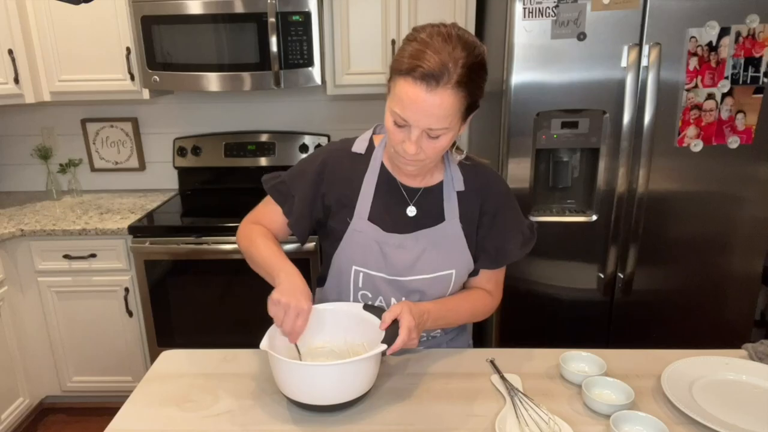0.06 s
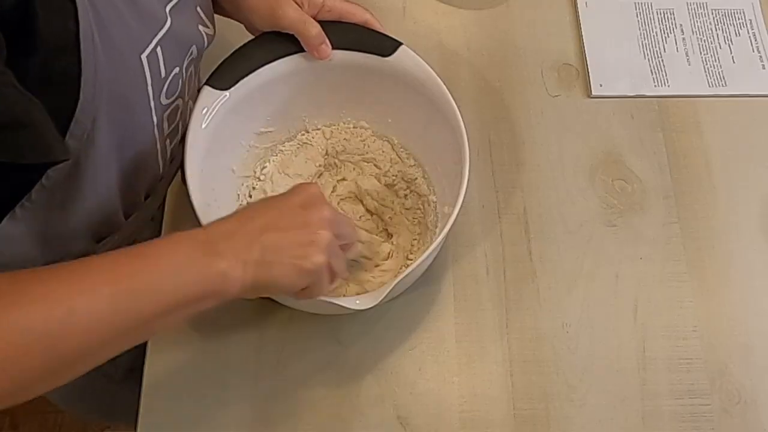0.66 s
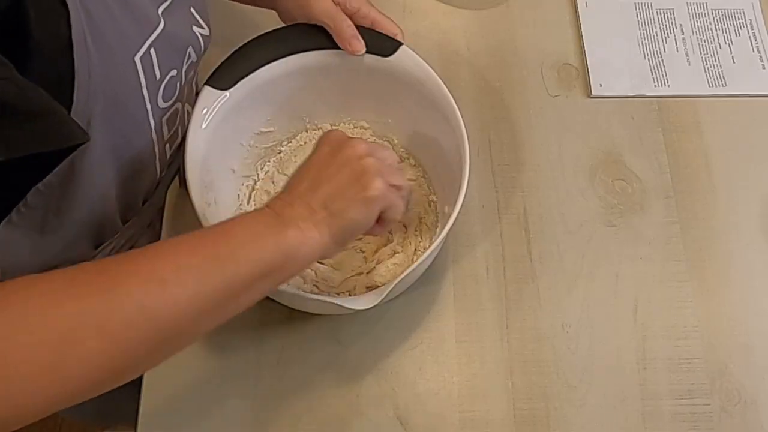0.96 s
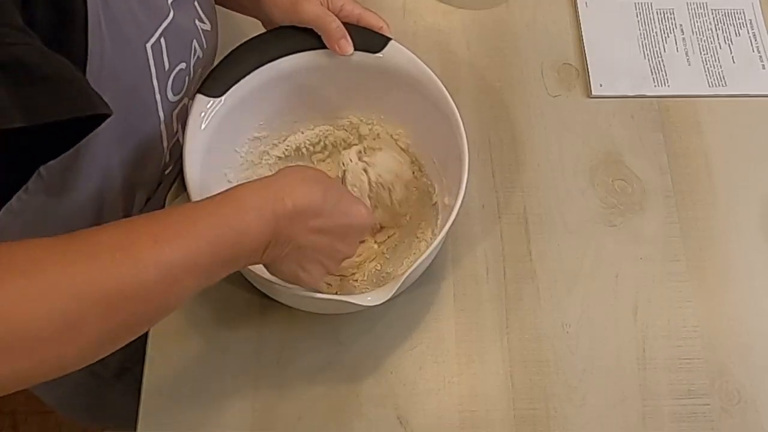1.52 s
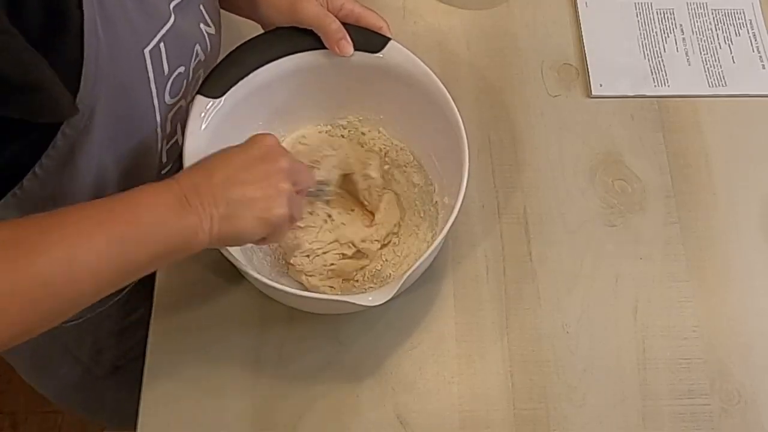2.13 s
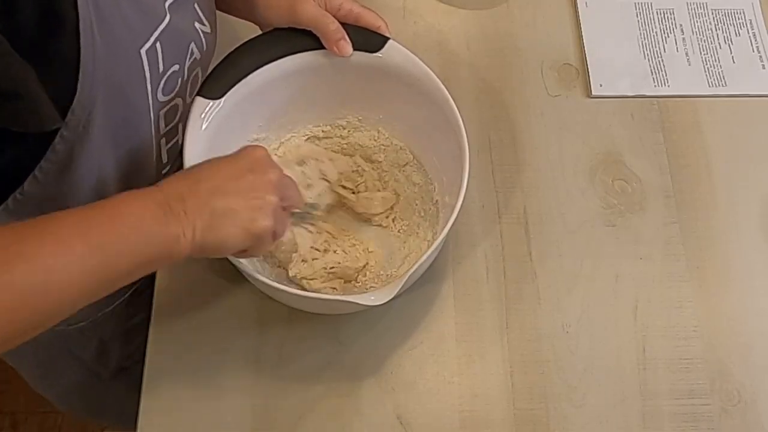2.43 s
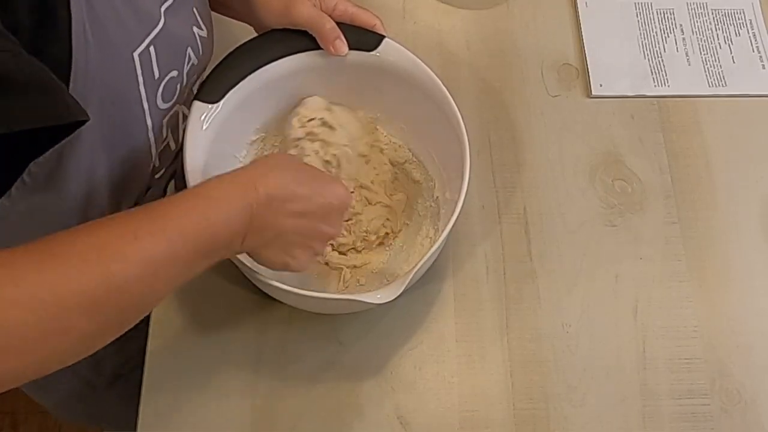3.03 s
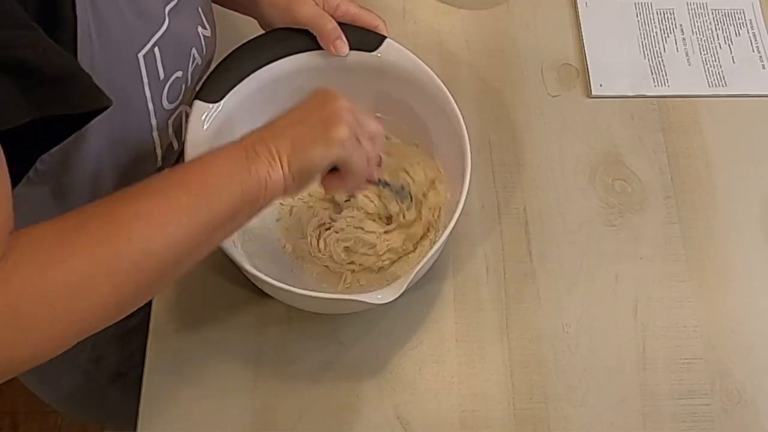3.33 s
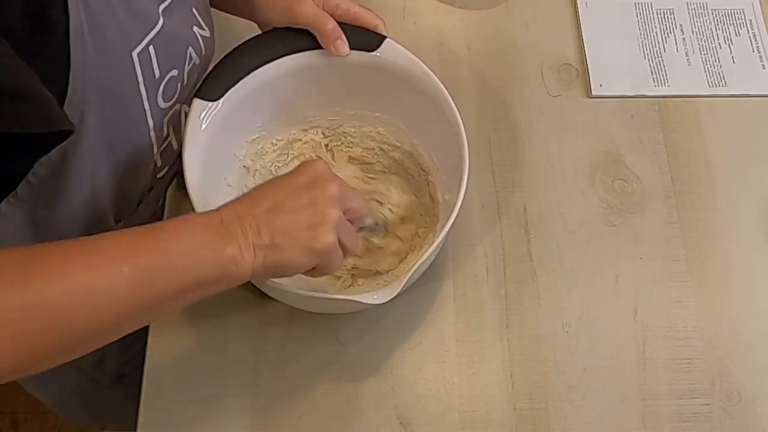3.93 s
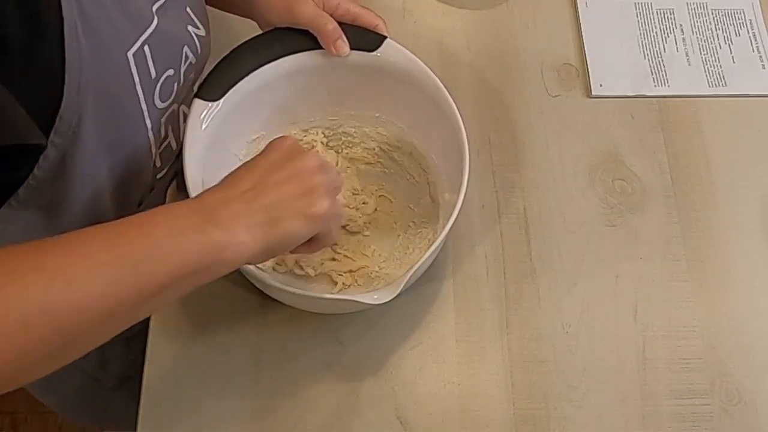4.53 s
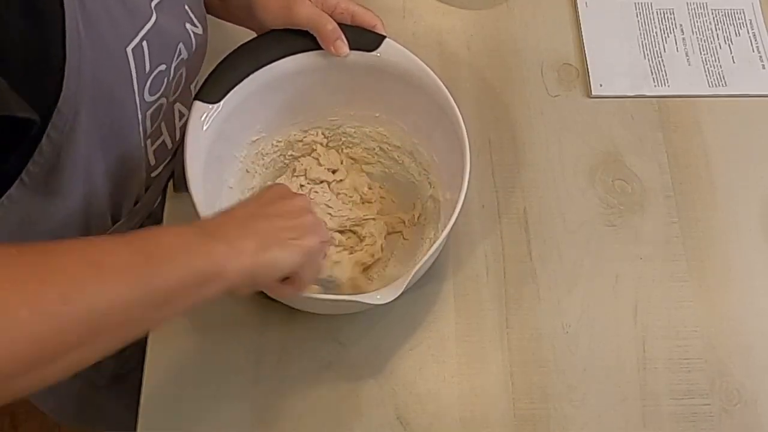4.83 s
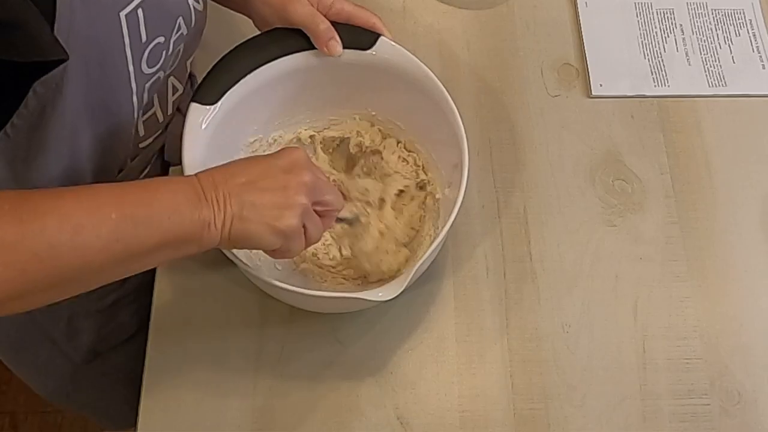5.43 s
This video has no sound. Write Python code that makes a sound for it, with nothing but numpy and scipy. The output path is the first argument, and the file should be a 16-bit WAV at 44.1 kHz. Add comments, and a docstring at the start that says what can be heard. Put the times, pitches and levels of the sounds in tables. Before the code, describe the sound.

Close, sticky stirring in a quiet kitchen: thick dough squelches, crackles and pops softly as a metal spoon pulls through it. The spoon taps the plastic bowl in an irregular rhythm, lightly at first, then with stronger damped knocks from the middle onward. A slight low rumble comes from the counter as the bowl shifts, and an appliance hums faintly throughout.

```python
"""Over faint room air and an appliance's hum, a metal spoon knocks on a plastic mixing bowl.
The knocks come unevenly, about three a second, damped by thick dough; the hard kitchen rings after each.
In between the spoon drags through the dough, which crackles, squelches and pops as trapped air escapes.
The bowl rocks softly and the counter rumbles under it."""
import sys
import numpy as np
from scipy import signal
from scipy.fft import rfft, irfft
from scipy.io import wavfile

SR = 44100
rng = np.random.default_rng(int(sys.argv[2]) if len(sys.argv) > 2 else 0)


def dump_mix(stems):
    """Bounce the given channels to the path in sys.argv[1] as a 16-bit WAV at rate SR."""
    frames = np.atleast_2d(stems).T  # one column per channel
    limited = np.clip(frames, -1, 1)  # hard clip at full scale
    pcm = np.round(limited * 32767).astype(np.int16)
    wavfile.write(sys.argv[1], SR, pcm)


N = 249650
TIME = np.arange(N) / SR


def from_db(db):
    """Decibels to gain."""
    return 10 ** (np.asarray(db) / 20)


def rms_one(x):
    """Scale to rms 1."""
    return x / np.sqrt(np.mean(x ** 2) + 1e-20)


def at_hz(points, hz):
    """Interpolate a table on a log-frequency axis."""
    points_hz, values = np.transpose(points)
    return np.interp(np.log(hz + 1e-9), np.log(points_hz), values)


def coloured(x, spectrum):
    """Filter by a (Hz, dB) curve; rms 1."""
    gain = from_db(at_hz(spectrum, np.fft.rfftfreq(N, 1 / SR)))
    return rms_one(irfft(rfft(x) * gain, N))


def band(x, low_hz, high_hz, order=2):
    """Causal band-pass."""
    return signal.sosfilt(signal.butter(order, [low_hz, high_hz], "band", fs=SR, output="sos"), x)


def slow_noise(cutoff_hz, shape):
    """Low-passed Gaussian noise."""
    return signal.sosfilt(signal.butter(2, cutoff_hz, fs=SR, output="sos"), rng.standard_normal(shape))


def add(out, start_s, sound):
    """Mix a sound in at start_s."""
    i = int(start_s * SR)
    out[i:i + len(sound)] += sound[:N - i]


def swell(start_s, rise_s, hold_s, fall_db_per_s):
    """Envelope: rise, hold until hold_s after the start, decay."""
    t = TIME - start_s
    return np.clip(t / rise_s, 0, 1) * from_db(-np.clip(fall_db_per_s * (t - hold_s), 0, 200))


# Appliance tones. Each row: frequency in Hz, rms level in dB.
HUM_TONES = [(314, -64), (116, -72)]
# Room air. Each row: frequency in Hz, relative density in dB.
AIR_SPECTRUM = [(26, -31.5), (45, 3.5), (60, -32), (321, -14), (566, -19.5), (706, -18), (818, -26.5),
                (1150, -20.5), (1440, -27), (1800, -25.5), (2080, -32.5), (4240, -35.5), (6440, -36),
                (14900, -39), (16000, -44)]


def background(air_db=-62.5):
    """An appliance hums steadily over the room air."""
    hum = sum(from_db(db) * np.sqrt(2) * np.sin(2 * np.pi * (hz * TIME + rng.random()))
              for hz, db in HUM_TONES)
    return hum + from_db(air_db) * coloured(rng.standard_normal(N), AIR_SPECTRUM)


def blow(x):
    """Normalise an impact by the energy in its first 8 ms."""
    return x / np.sqrt(np.sum(x[:SR // 125] ** 2) / (SR // 100))


def struck(modes, detune, pitch_ratio=0.96):
    """Decaying modes; the spot struck and the dough's load vary their strength and pitch."""
    t, out = TIME[:SR // 2], 0
    for hz, db, t60_s in modes:
        loaded_hz = hz * pitch_ratio * (1 + detune * rng.normal())
        envelope = from_db(db + 2 * rng.normal() - 60 * t / t60_s)
        out = out + envelope * np.sin(2 * np.pi * loaded_hz * t)
    return out


def burst(low_hz, high_hz, t60_s, snap):
    """An impulse of height snap and a short decay of noise, band-passed."""
    t = TIME[:SR // 20]
    force = rng.standard_normal(len(t)) * from_db(-60 * t / t60_s)
    force[0] = snap
    return blow(band(force, low_hz, high_hz))


# Modes of the dough-laden base and wall, the bare wall and the spoon.
# Each row: nominal frequency in Hz, relative level in dB, T60 in seconds.
BASE_MODES = [(157.4, -3.5, 0.032), (366.3, -2, 0.03), (452, -2.5, 0.027), (550, -1.5, 0.016)]
WALL_MODES = [(701, -2.5, 0.037), (900, -3, 0.0076), (1054, -8.5, 0.013), (1510, -8.5, 0.0071),
              (1870, 4, 0.013), (2420, -6.5, 0.0062)]
BARE_WALL_MODES = [(490, -11, .14), (865, -3, .05), (985, -9, .045), (1165, -10, .05)]
SPOON_MODES = [(2420, -28, 0.024), (3140, 10, 0.023), (3450, 4.5, 0.0062), (4300, 9, 0.0064),
               (4410, -1.5, 0.0039)]
# Spoon on bowl. Each row: start in seconds, relative levels of thud, clack, tick and crack in dB,
# thud pitch in Hz.
SPOON_HITS = [(0.0699, -28, -39.5, -58, -77, 435), (0.1268, -31.5, -33, -42, -54, 404),
              (0.2214, -40, -39, -56, -61, 407), (0.3467, -43, -51.5, -51, -59, 393),
              (0.422, -33.5, -43, -43, -50, 357), (0.7008, -41.5, -46, -61, -54, 475),
              (0.744, -39.5, -43.5, -52, -53, 358), (1.0432, -51, -49, -48, -54, 544),
              (1.2269, -29.5, -35, -51, -72, 445), (1.96, -21, -27.5, -28, -48, 404),
              (2.0859, -28, -33.5, -69, -50.5, 447), (2.2606, -21, -20, -22, -39, 400),
              (2.5456, -21, -30, -32, -53, 460), (2.889, -17.5, -20.5, -28, -44, 437),
              (3.5261, -24.5, -30, -52, -68, 430), (3.8916, -20, -24, -38, -70, 448),
              (4.017, -43, -43.5, -72, -64, 504), (4.0299, -34, -46, -65, -72, 476),
              (4.2114, -27, -30.5, -36.5, -61, 413), (4.5141, -19, -24, -31.5, -44.5, 455),
              (4.5314, -35, -35.5, -53, -45, 393), (4.887, -21, -30, -65, -64, 436),
              (5.5424, -34, -50, -66, -68, 406)]


def knocks(thud_lag_s=0.00077, base_centre_hz=423, ring_db_per_db=1.83):
    """The spoon ticks on the wall, which clacks at once; the heavy base follows with a thud."""
    out = np.zeros(N)
    for start_s, thud_db, clack_db, tick_db, crack_db, thud_hz in SPOON_HITS:
        base = band(struck(BASE_MODES, detune=0.01, pitch_ratio=thud_hz / base_centre_hz), 260, 1400)
        wall = band(struck(WALL_MODES, detune=0.025), 500, 2600)
        spoon = band(struck(SPOON_MODES, detune=0.038), 3360, 4190, order=3)
        add(out, start_s + thud_lag_s, from_db(thud_db) * blow(base))
        add(out, start_s, -from_db(clack_db - 4) * blow(wall))
        add(out, start_s, -from_db(tick_db - 6) * blow(spoon))
        crack = from_db(crack_db) * burst(6600, 9760, t60_s=0.0066, snap=10.8)
        # the spoon skids on landing, roughening clack and tick
        skid = from_db(clack_db - 4.5) * burst(1110, 2590, t60_s=0.018, snap=0)
        grit = from_db(tick_db - 14.5) * burst(1560, 4440, t60_s=0.026, snap=-7.5)
        add(out, start_s, crack + skid + grit)
        # more clack than thud means bare wall, which rings on
        ring_db = clack_db + ring_db_per_db * (clack_db - thud_db)
        add(out, start_s, from_db(ring_db) * struck(BARE_WALL_MODES, detune=0.0044))
    return out


# Kitchen decay. Each row: frequency in Hz, T60 in seconds.
ECHO_DECAY = [(80, 0.11), (400, 0.56), (800, 0.46), (1700, 0.49), (4000, 0.49), (8000, 0.45), (15000, 0.2)]
# Kitchen colour. Each row: frequency in Hz, gain in dB.
ECHO_SPECTRUM = [(60, 3), (130, -1), (250, -5.5), (350, -1.5), (480, -5.5), (700, 0.5), (1200, -0.5),
                 (1900, 4), (3000, -9), (4500, 7), (8000, -4.5), (15000, -14)]


def kitchen(x, first_echo_s=0.0031, build_s=0.0023):
    """Diffuse echoes build quickly and decay, soonest in the bass and the top treble."""
    t, tail = TIME[:SR], 0
    onset = np.clip((t - first_echo_s) / build_s, 0, 1)
    edges_hz = np.geomspace(45, 17000, 18)
    for low_hz, high_hz in zip(edges_hz, edges_hz[1:]):
        centre_hz = np.sqrt(low_hz * high_hz)
        decay = from_db(-60 * t / at_hz(ECHO_DECAY, centre_hz))
        echoes = band(rng.standard_normal(SR), low_hz, high_hz, order=3) * decay * onset
        share = np.sqrt(2 * (high_hz - low_hz) / SR / np.sum(echoes ** 2))   # equal energy per Hz
        tail = tail + from_db(at_hz(ECHO_SPECTRUM, centre_hz)) * share * echoes
    return signal.fftconvolve(x, tail)[:N]


def stroke(start_s, length_s, grab_s=0.037, arch_db=4, cling_db=-16.5):
    """Envelope of one pull: the dough grabs, resists most in mid-stroke, peels off and clings a little."""
    progress = np.clip((TIME - start_s) / length_s, 0, 1)
    arch = from_db(arch_db * (np.sin(np.pi * progress) - 1))
    peel = swell(start_s, grab_s, length_s, fall_db_per_s=336)
    cling = from_db(cling_db) * swell(start_s, grab_s, length_s, fall_db_per_s=77)
    return arch * np.maximum(peel, cling)


def strands(per_s, spread_db, hiss):
    """Dough strands snap at random, over the hiss of those too small to tell apart."""
    sizes = from_db(spread_db * np.minimum(rng.exponential(1, N), 5)) * rng.choice([-1, 1], N)
    snapping = rng.random(N) < per_s / SR
    return rms_one(sizes * snapping) + hiss * rng.standard_normal(N)


# Colours of the dragged dough. Each row: frequency in Hz, relative density in dB.
CRACKLE_SPECTRUM = [(800, -55), (3000, -22), (5000, -26), (6300, -4), (8000, 1.5), (10000, -1),
                    (12500, -13), (15500, -22)]
SMEAR_SPECTRUM = [(50, -22), (150, -21), (300, -7.5), (520, 6), (700, -3), (880, -5.5), (1150, -6.5),
                  (1800, 5), (2200, -0.5), (3000, 5), (4400, 3), (5600, -8), (9000, -33), (15000, -51.5)]
TEARING_SPECTRUM = [(1500, -53), (5000, -2.5), (8000, -1), (10500, 9), (12500, 1), (15500, -10)]
# Spoon through dough. Each row: start and length in seconds, relative crackle and smear levels in dB.
DOUGH_STROKES = [(0.108, 0.13, -51, -44.5), (0.387, 0.1, -46, -44), (0.53, 0.049, -48, -48),
                 (0.587, 0.093, -58.5, -54), (0.657, 0.071, -45.5, -48), (0.715, 0.079, -52, -44.5),
                 (0.808, 0.11, -52, -47.5), (0.939, 0.14, -50, -48), (1.224, 0.17, -51.5, -46.5),
                 (1.308, 0.3, -48.5, -44.5), (1.524, 0.11, -51, -44.5), (1.966, 0.038, -58.5, -48),
                 (2.262, 0.059, -51, -51), (2.542, 0.099, -52.5, -48.5), (2.813, 0.072, -62.5, -69),
                 (2.923, 0.3, -45, -40.5), (3.528, 0.18, -58.5, -51), (3.598, 0.079, -50.5, -42.5),
                 (3.885, 0.1, -50.5, -44.5), (4.223, 0.068, -58.5, -53.5), (4.505, 0.028, -41.5, -42),
                 (4.547, 0.042, -54, -46.5), (4.758, 0.16, -68.5, -67), (4.927, 0.065, -48, -45),
                 (5.014, 0.08, -44, -41), (5.087, 0.14, -50.5, -42), (5.534, 0.053, -58.5, -52.5)]


def dragging(clump_db=2, slip_hz=45, hard_pull_db=-46):
    """Each stroke peels dough off the wall: fine crackle on a duller wet smear."""
    crackle_gain, smear_gain = from_db(-76), from_db(-72)   # the spoon still slides between strokes
    for start_s, length_s, crackle_db, smear_db in DOUGH_STROKES:
        contact = stroke(start_s, length_s)
        crackle_gain = np.maximum(crackle_gain, contact * from_db(crackle_db))
        smear_gain = np.maximum(smear_gain, contact * from_db(smear_db))
    clumps = from_db(clump_db * rms_one(slow_noise(slip_hz, N)))   # stick-slip
    thick_snaps = from_db(-13.5) * strands(per_s=120, spread_db=7, hiss=0)
    snaps = clumps * strands(per_s=4500, spread_db=1.5, hiss=0.5) + thick_snaps
    fine_snaps = clumps * strands(per_s=3400, spread_db=2.5, hiss=0.34)
    crackle = from_db(-2.5) * coloured(snaps + fine_snaps, CRACKLE_SPECTRUM)
    smear = from_db(-1) * coloured(snaps, SMEAR_SPECTRUM)
    # a hard pull tears finer strands and sounds brighter
    pull = np.sqrt(np.minimum(crackle_gain / from_db(hard_pull_db), 2))
    finest_snaps = clumps * strands(per_s=2400, spread_db=4.5, hiss=0.3)
    tearing = from_db(-14) * pull * coloured(finest_snaps, TEARING_SPECTRUM)
    return crackle_gain * (crackle + tearing) + smear_gain * smear


# Counter rumble. Each row: frequency in Hz, relative density in dB.
COUNTER_SPECTRUM = [(25, 0), (55, -20), (76, 5), (100, -4.5), (135, -11.5), (300, -13), (1200, -86)]
# The bowl rocks. Each row: start in seconds, rumble level in dB.
BOWL_JOLTS = [(0.12, -45), (2.085, -38.5), (3.89, -36.5), (4.02, -41.5), (5.54, -39.5)]


def rocking(push_db=-59, firm_thud_db=-19.5, firm_rumble_db=-45, rumble_db_per_db=0.25):
    """The counter rumbles under the push of stirring, more after a knock or when the bowl rocks."""
    knock_jolts = [(start_s, firm_rumble_db + rumble_db_per_db * (thud_db - firm_thud_db))
                   for start_s, thud_db, *_ in SPOON_HITS]
    gain = from_db(push_db)
    for start_s, db in knock_jolts + list(BOWL_JOLTS):
        jolt = from_db(db) * swell(start_s, rise_s=0.0048, hold_s=0, fall_db_per_s=94)
        gain = np.maximum(gain, jolt)
    return gain * coloured(rng.standard_normal(N), COUNTER_SPECTRUM)


# Wide squelches and narrow squeaks.
# Each row: start and end in seconds, start and end pitch in Hz, bandwidth in Hz, level in dB.
SQUELCH_GLIDES = [(0.151, 0.232, 3290, 2906, 1100, -46.5), (0.439, 0.516, 3640, 2900, 1060, -42.5),
                  (0.7, 0.727, 912, 845, 24.8, -42), (0.961, 1.013, 867, 873, 25, -52),
                  (1.352, 1.487, 3820, 2510, 855, -43.5), (2.968, 3.078, 3340, 2623, 1000, -46),
                  (3.605, 3.69, 2540, 2906, 870, -42.5), (5.094, 5.228, 2615, 3124, 1000, -51)]


def squelches():
    """Cavities glide in pitch as the spoon pulls them open; on bare plastic the spoon squeaks."""
    out = np.zeros(N)
    for start_s, end_s, from_hz, to_hz, width_hz, db in SQUELCH_GLIDES:
        n = int((end_s - start_s) * SR)
        flutter = rms_one(slow_noise(width_hz / 2, (2, SR))[:, -n:])
        phase = 2 * np.pi * np.cumsum(np.geomspace(from_hz, to_hz, n)) / SR
        glide = flutter[0] * np.cos(phase) + flutter[1] * np.sin(phase)
        arch = np.sin(np.linspace(0, np.pi, n))
        add(out, start_s, from_db(db) * arch * glide)
    return out


# Air in the dough. Each row: start in seconds, relative levels of the low, middle and top bands in dB.
AIR_POCKETS = [(0.2002, -44, -50, -44), (0.404, -53, -44, -66), (0.4728, -64, -44, -55),
               (0.4933, -45, -42, -61), (0.85, -32, -38, -46), (1.0189, -45, -42.5, -61),
               (1.0582, -42.5, -40.5, -37.5), (1.3159, -52, -45.5, -46.5), (1.346, -68, -38, -47),
               (1.5676, -37.5, -48, -69), (2.0886, -55, -52, -64), (3.0426, -44.5, -39, -57),
               (4.9853, -69, -37, -49.5), (5.058, -60, -37, -51), (5.112, -55, -44, -66),
               (5.1778, -44, -32.5, -63)]


def pops(gain_db=-2.5):
    """Trapped air breaks out with a short smack."""
    out = np.zeros(N)
    for start_s, low_db, middle_db, top_db in AIR_POCKETS:
        smack = from_db(low_db) * burst(750, 2300, t60_s=0.011, snap=4)
        smack += from_db(middle_db) * burst(2460, 4200, t60_s=0.012, snap=1.9)
        smack += from_db(top_db) * burst(6000, 10500, t60_s=0.006, snap=5)
        add(out, start_s, from_db(gain_db) * smack)
    return out


def scene(knock_send_db=-5.5, dough_send_db=-7):
    """Bowl and dough close by, the kitchen around them; mono."""
    bowl = knocks()
    dough = dragging() + squelches() + pops()
    room = kitchen(from_db(knock_send_db) * bowl + from_db(dough_send_db) * dough)
    return (bowl + dough + room + rocking() + background())[None]


def record(dry):
    """Steep low-pass at 15850 Hz."""
    return signal.sosfilt(signal.ellip(10, 0.1, 70, 15850, fs=SR, output="sos"), dry)


dry = scene()
out = record(dry)
dump_mix(out)
```